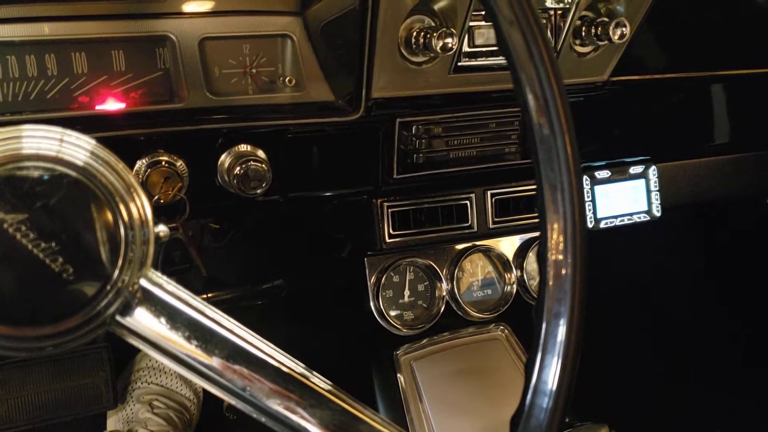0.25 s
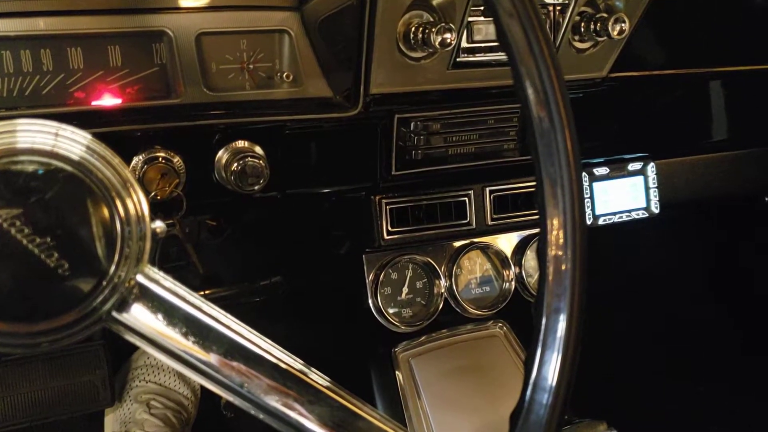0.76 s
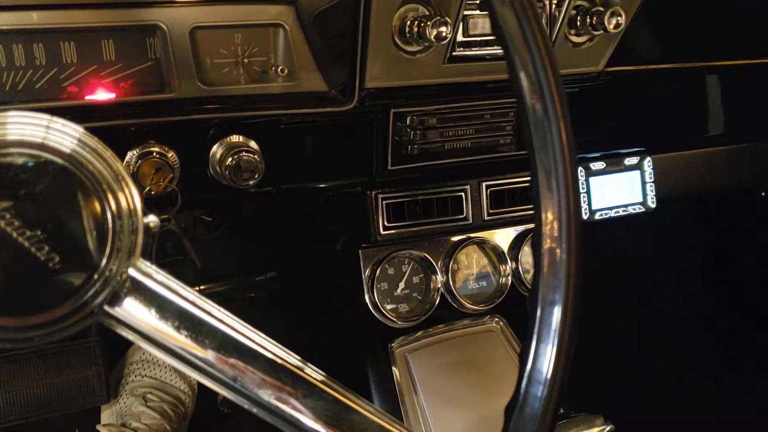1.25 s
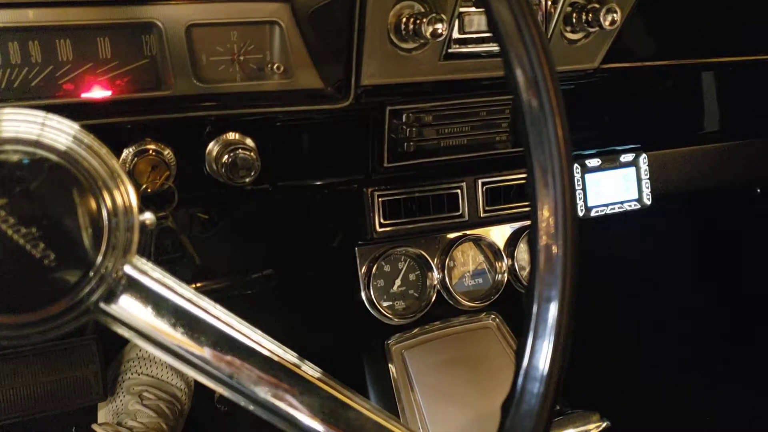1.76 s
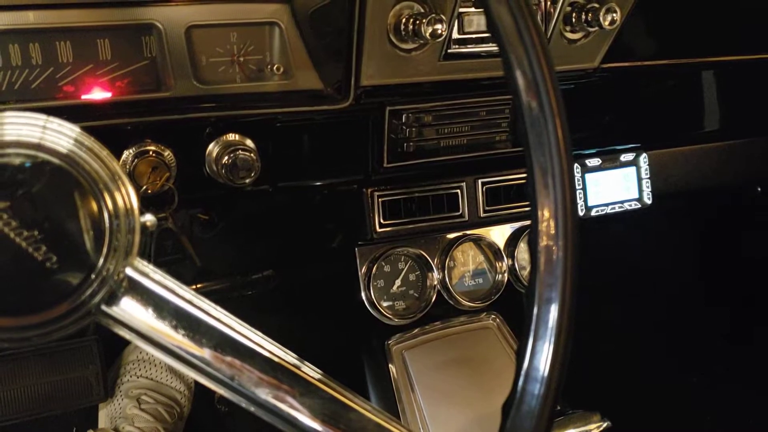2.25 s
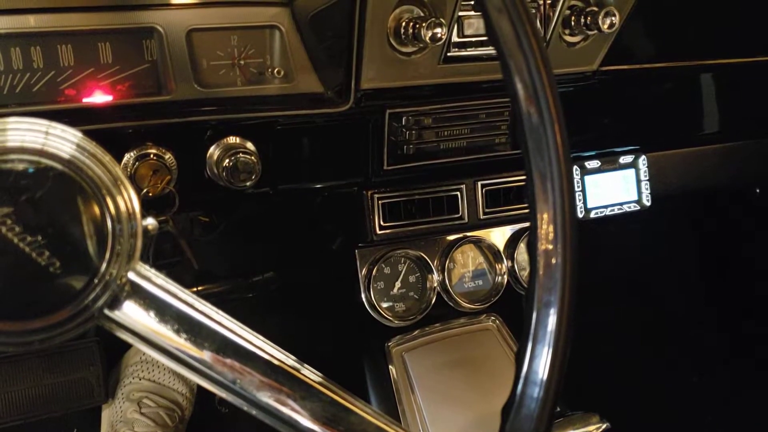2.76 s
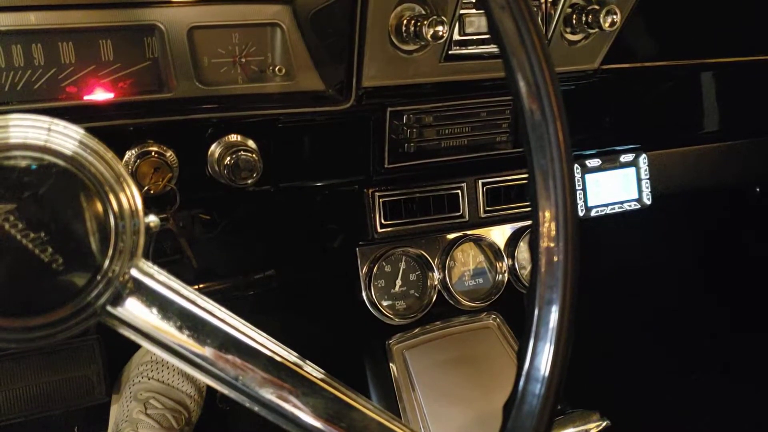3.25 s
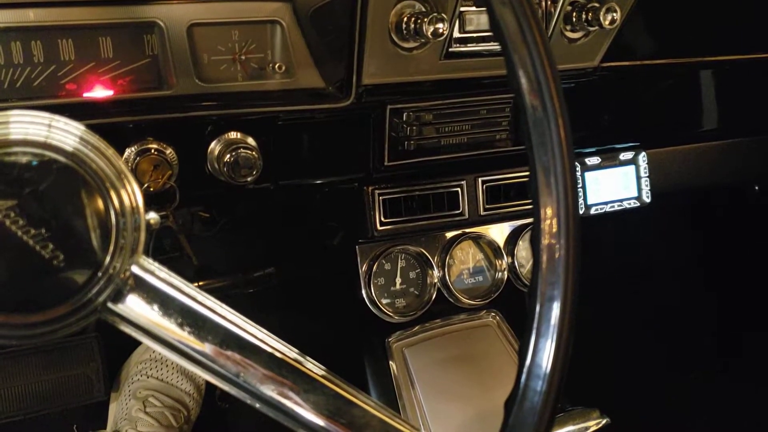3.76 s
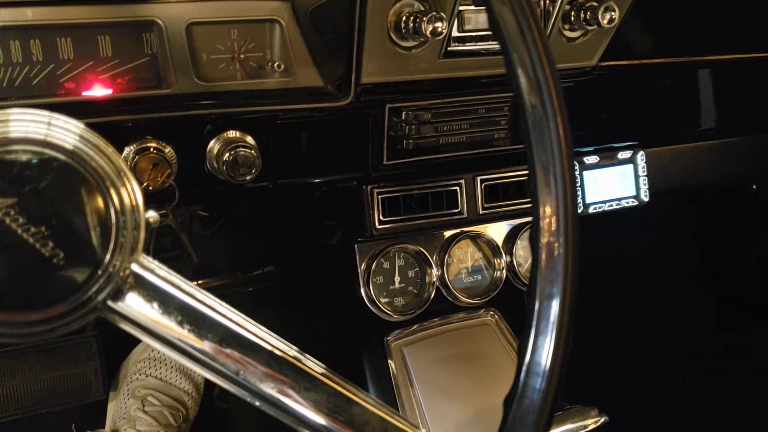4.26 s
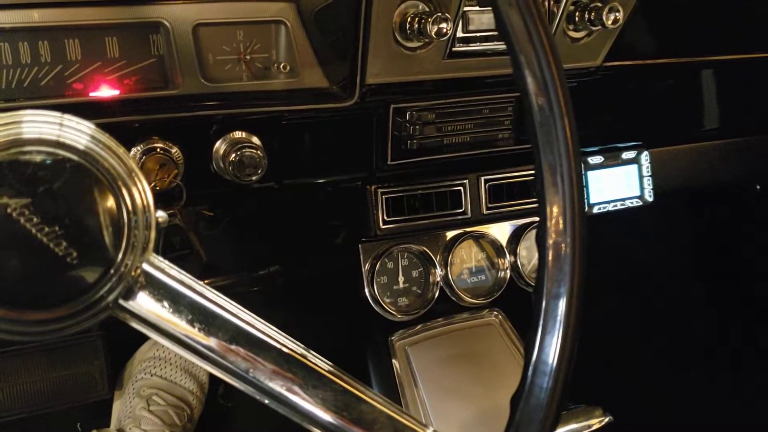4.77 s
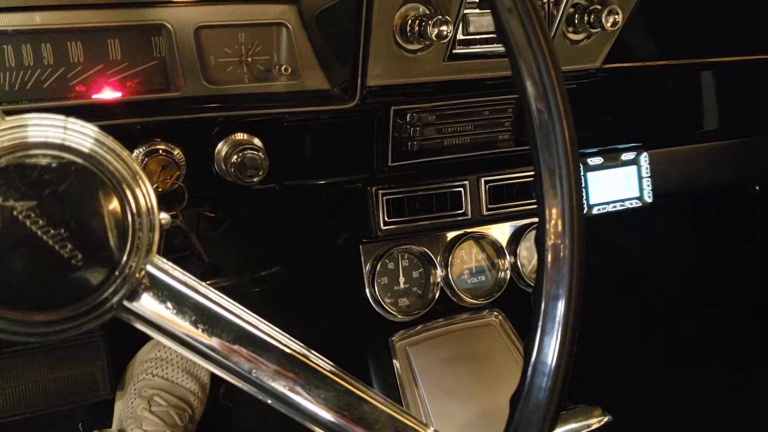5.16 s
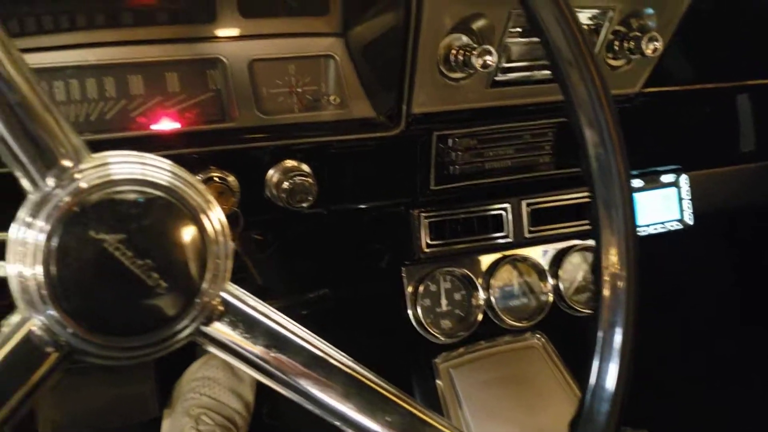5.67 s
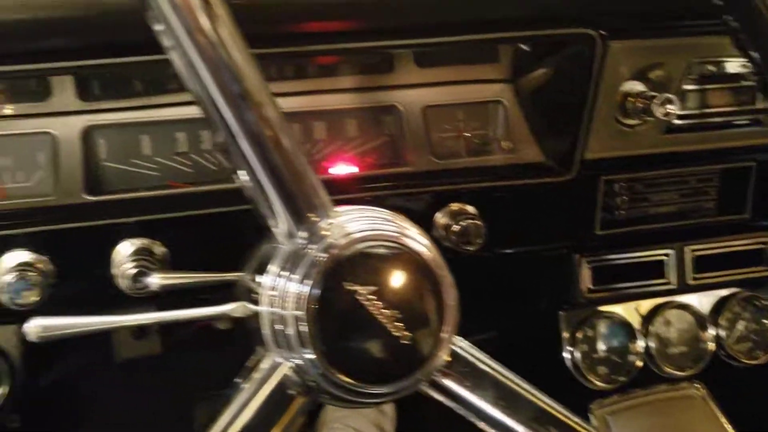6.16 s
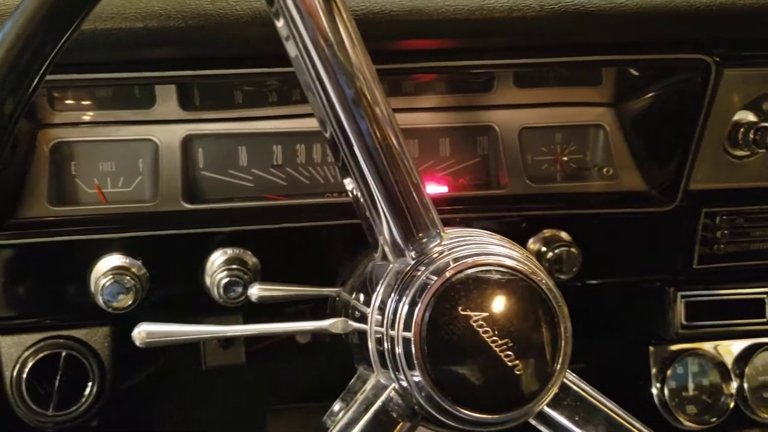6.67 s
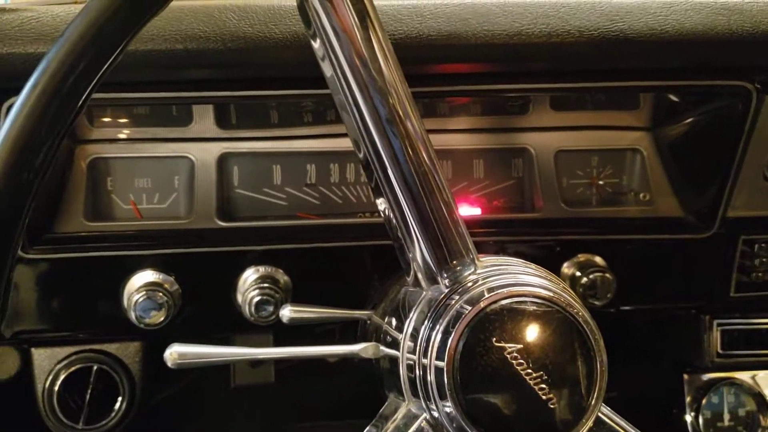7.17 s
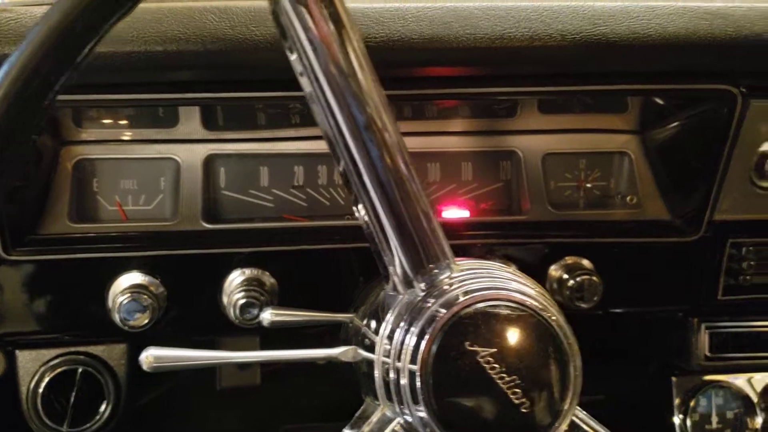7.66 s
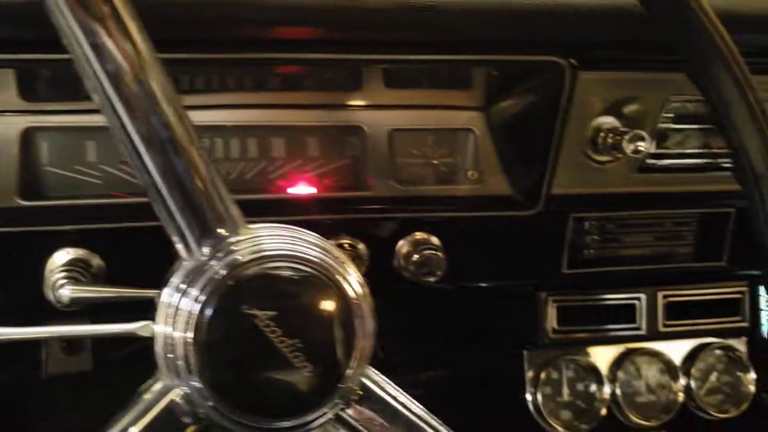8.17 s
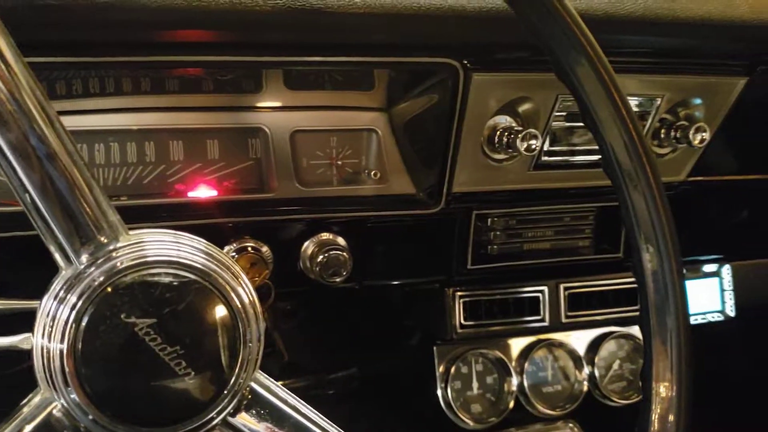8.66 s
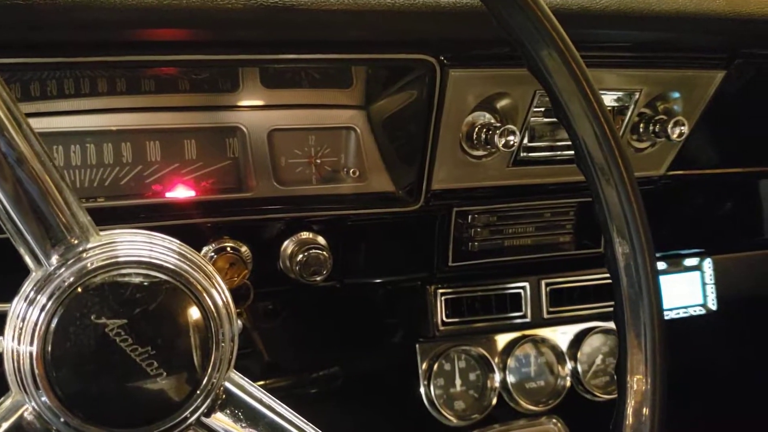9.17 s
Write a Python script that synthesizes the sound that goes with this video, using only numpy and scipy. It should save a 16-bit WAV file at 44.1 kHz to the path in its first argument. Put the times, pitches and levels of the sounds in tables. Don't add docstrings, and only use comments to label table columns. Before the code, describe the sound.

Inside a car cabin, a big eight-cylinder petrol engine climbs at once into a throaty roar, drops, then is blipped again. It falls with brief low booms to a slow, lumpy idle by about four seconds. Intake and fan hiss, valve chatter and trembling panels surround the beat. The close stereo microphone hears the hiss brighter on the left.

```python
import sys
import numpy as np
from scipy import signal
from scipy.fft import rfft, irfft
from scipy.io import wavfile
from scipy.ndimage import uniform_filter1d

SR = 44100
rng = np.random.default_rng(int(sys.argv[2]) if len(sys.argv) > 2 else 0)


def undo_db(level):
    steps = np.asarray(level, float) / 20
    return 10 ** steps


def unload_audio(sound):
    columns = np.transpose(np.atleast_2d(sound))
    steps = np.round(np.clip(columns, -1, 1) * 32767)
    wavfile.write(sys.argv[1], SR, steps.astype(np.int16))


N = 415422
T = np.arange(N) / SR
HZ = np.maximum(np.fft.rfftfreq(N, 1 / SR), 1)

# t/s, f/Hz
SPEED = [(0.0, 13.7), (0.2, 14.0), (0.38, 16.3), (0.63, 22.8), (0.81, 26.3), (0.89, 25.8), (1.38, 15.9),
         (1.5, 16.4), (1.65, 19.3), (1.81, 23.3), (1.96, 25.0), (2.06, 22.8), (2.45, 16.4), (2.7, 13.2),
         (2.91, 10.9), (3.12, 9.45), (3.3, 8.42), (3.49, 7.77), (3.8, 6.73), (3.97, 6.52), (9.42, 6.52)]
# t/s, loss/Hz, half length/s
STUMBLES = [
    (4.448, -.156, .17),
    (5.1, .174, .1),
    (5.893, -.078, .184),
    (7.281, .325, .27),
    (8.153, .265, .242),
    (8.744, -.094, .073),
    (9.22, .12, .12),
]
HUNT_HZ, HUNT_RATE_HZ = .008, 6
# t/s, held/s, depth
BLIPS = [
    (0.24, 0.12, 0.32),
    (0.38, 0.476, 0.81),
    (1.47, 0.505, 0.5),
]
PEDAL_DOWN_S, PEDAL_UP_S = 0.037, 0.3
# f/Hz, lumpy beat level/dB, hiss level/dB, panel rumble level/dB
EFFORT = [(6.07, -15, -41.5, -41.5), (8.6, -15.5, -43.5, -37.5), (10.1, -11, -39.5, -34.5),
          (13.44, -2, -36, -31), (13.83, -32.5, -34, -32), (16.63, -18.5, -33.5, -28),
          (21.1, -0.5, -28.5, -24.5), (25.7, -15.5, -28.5, -23.5)]
PEDAL_HISS_DB, PEDAL_RUMBLE_DB, PEDAL_BEAT_DB = 4.5, 4, -9
# t/s, level/dB
CAMERA_GAIN = [(0, -15.5), (.5, -12.5), (1.35, -15), (1.7, -6.5), (2.5, -13), (3.3, -11), (4.1, -9.5),
               (5, -7), (5.55, -7.5), (5.72, -4), (6.15, 0), (7.3, 1.5), (8.3, -0.5), (9.42, -1)]
BEAT_FOLLOWS, RUMBLE_FOLLOWS = 0.46, 0.89
LOPE_DB = 0.56
# t/s, level/dB
SURGES = [(4.2, -1.5), (4.6, -2), (5.0, -1), (5.45, -0.5), (5.85, -1), (6.2, 0), (6.6, -1), (7.0, 0.5),
          (7.35, -1), (7.7, 2), (8.05, -0.5), (8.4, 0.5), (8.7, 1.5), (9.1, 0)]
SURGE_HALF_S = 0.32
# t/s, hiss level/dB
LULLS = [
    (4.15, -3.5),
    (5.08, 1.5),
    (5.545, -3.5),
    (5.85, -1),
    (7.38, -1.5),
    (8.17, -5),
    (8.47, -4.5),
    (9.1, 0.5),
]
LULL_HALF_S = 0.02

# level/dB, lateness/firing intervals
CYLINDERS = [(.7, .63), (5, .15), (.2, .7), (.1, .13), (-4, .02), (-7.2, -.62), (-9.9, .46), (2.2, .06)]
BANKS = [1, -1, -1, 1, -1, 1, 1, -1]
# f/Hz, width/Hz, level/dB, sign
CABIN = [(56, 16.7, -1.5, 1), (65.2, 6.5, 3.2, -1), (84, 12, -14.2, -1), (124, 10, -24.5, -1),
         (40, 10, -13.9, 1)]
# f/Hz, width/Hz, level/dB, signed weight
PIPES = [(43.2, 35, -19, 0.78), (65.7, 13, 2.5, -0.59), (91, 15, -3, 0.54), (125, 33, -4, -0.67),
         (157, 16, -10, 0.61), (205, 16, -8.5, -1.7), (324, 61, -3, 0.41), (418, 240, -14.5, -0.35)]
# firing f/Hz, level/dB
DRONE_PULL = [(110, -16.5), (122, -8.5), (134, -5.5), (157, -6.5), (172, -17.5), (186, -23), (196, -36),
              (210, -16)]
# firing f/Hz, level/dB
DRONE_COAST = [(52, -59), (61, -6), (68, -3), (76, 1.5), (87, -2.5), (105, -25.5), (127, -6.5), (146, -38)]
OVERRUN_HZ, OVERRUN_WIDTH_HZ, OVERRUN_DB = 185, 12, -38
OVERTONE_HZ, OVERTONE_WIDTH_HZ, OVERTONE_DB = 125, 12, -15

ORDERS = [2, 3, 4, 5, 6, 7, 9, 10, 11, 13, 16, 19, 21, 24, 27, 32]
# pulling level/dB, coasting level/dB
ORDERS_HEARD = [(-6, -12), (-13.5, -5.5), (-10.5, -6.5), (-8, -8.5), (-18.5, -12.5), (-35, -17.5),
                (-24, -9), (-41, -16.5), (-13, -14), (-10, -21), (-14.5, -18), (-15.5, -23), (-16.5, -24.5),
                (-16.5, -23), (-23.5, -32), (-25, -27)]
# f/Hz, level/dB
BODY_PULL = [(35, -34), (50, -20), (62, -9), (72, -3.5), (82, 2.5), (97, -15.5), (117, -2.5), (135, -4.5),
             (275, -11.5), (310, -20), (480, -15), (620, -26), (850, -19), (1000, -36)]
# f/Hz, level/dB
BODY_COAST = [(35, -26), (48, -8), (56, -6), (63, 3), (76, -1), (85, -4), (97, -18.5), (115, -4), (140, -3),
              (170, -30), (300, -14), (500, -32), (1000, -45)]
FLOOR_HZ, FLOOR_WIDTH_HZ, FLOOR_DB = 205, 11.4, -6.5
GROWL_DB, GROWL_WAVER_DB = -0.5, 1.1
UPPER_IDLE_DB = -15

# f/Hz, spectral level/dB
HISS_IDLE = [(900, -23.5), (1200, -12.5), (1600, -3), (1950, -2), (2300, -8.5), (2900, -11), (3400, -7),
             (4200, -5), (4900, -11), (6200, -9), (7000, -9), (8300, -18.5), (11500, -24.5), (15600, -46.5)]
# f/Hz, spectral level/dB
HISS_REV = [(600, -33), (830, 3.5), (1000, -16), (1300, -8), (1700, -4.5), (2050, 3.5), (2500, -8),
            (2900, -8), (4100, -5.5), (5200, -11), (7000, -7), (8300, -19.5), (11500, -23), (15000, -61)]
# f/Hz, width/Hz, level/dB, signed weight
INTAKE_IDLE = [(1744, 40, 3.5, 0.86), (1830, 30, -3, 1), (1908, 21, 5, -1.2), (2067, 18, 8.5, 0.64),
               (2163, 13, 4, -0.97), (1310, 60, -2, 0.95), (2364, 32, -3, 0.92), (2567, 38, -2, -0.82),
               (2770, 25, -5.5, 0.87)]
# f/Hz, width/Hz, level/dB, signed weight
INTAKE_REV = [(1995, 51, 2, 1), (2196, 46, 0, -1.13), (2346, 85, -3, 0.77), (2530, 93, -1.5, -0.75),
              (820, 61, -2.5, 0.97), (2985, 120, -13.5, 0.86), (3950, 230, -7, 0.81),
              (5200, 390, -14, -1.08)]
# f/Hz, width/Hz, level/dB, sign
TAPPETS = [(3370, 250, -10, 1), (3685, 290, -4.5, 1), (4243, 380, -4, 1), (4520, 120, -13, 1)]
RASP_DB, RASP_LOAD_DB, RASP_OPEN_DB = -14.5, 8, 10
RASP_SHUT_S = 0.044
RASP_GLIDE = .07

# f/Hz, spectral level/dB
RUMBLE = [(30, -31), (70, 11), (150, 5), (208, -2), (260, -7.5), (360, -13), (600, -17), (850, -15),
          (1200, -24), (1500, -45.5)]
# f/Hz, width/Hz, level/dB, signed weight
SEAT = [(39.7, 5, -3.5, 0.83), (33, 6, -2, -1), (132.6, 33, -4.5, 1)]
# f/Hz, width/Hz, level/dB, signed weight
DASH = [(420, 20, -52, 0.89), (678.4, 47, -47.5, 0.74), (970, 13, -54.5, 0.64), (1856, 30, -60, 0.52),
        (4200, 43, -97, 0.56)]
# f/Hz, level/dB against the rumble
WHINES = [(421, -12), (673, -14.5), (712, -18), (832, -21), (952, -15), (1018, -21.5)]
BASS_CLEARS = .55
BUZZ_HZ, BUZZ_DB, BUZZ_FLUTTER_DB = 676, -2, 3
# t/s, f/Hz, rms level/dB, half length/s
SHUDDERS = [
    (.04, 148.4, -31.5, 0.11),
    (1.42, 63.1, -19.5, 0.25),
    (2.002, 40.4, -22, 0.051),
    (2.234, 62.5, -13, 0.033),
    (2.438, 61.8, -15, 0.06),
]
# t/s, peak level/dB
CREAKS = [(3.408, -56), (3.438, -60), (3.455, -55), (3.471, -51), (3.487, -54), (3.503, -57), (3.519, -56),
          (3.537, -48), (3.552, -57), (3.568, -54), (3.585, -53), (3.618, -54), (3.634, -59)]
# f/Hz, width/Hz, level/dB, sign
CREAK_RING = [(11800, 1200, -2, 1), (14600, 5000, -5, -1)]

# f/Hz, right minus left level/dB
RIGHT = [(50, -2.5), (75, -2.8), (120, -4.5), (300, -5.5), (600, -5), (900, -9), (2000, -9), (2900, -12),
         (4200, -15), (7000, -18), (8300, -18), (9500, -4), (11800, 5.5), (15000, 0.14)]
# f/Hz, likeness from 0 to 1
LIKE = [(100, .93), (250, .78), (600, .77), (900, .55), (2000, .55), (3000, .12), (8000, .05)]
RIGHT_LAG_S = 20 / 44100


def curve(table):
    s, *columns = np.transpose(table)
    return [np.interp(T, s, column) for column in columns]


def against(x, table):
    at, *columns = np.transpose(table)
    return [np.interp(np.log(x), np.log(at), column) for column in columns]


def spectrum(points):
    return against(HZ, points)[0]


def bump(x, centre, half):
    return np.exp(-((x - centre) / half) ** 2)


def modes(table):
    response = 0
    for hz, width, db, sign in table:
        damping = 1j * HZ * width
        response = response + sign * undo_db(db) * damping / (hz ** 2 - HZ ** 2 + damping)
    return response


def high_pass(hz):
    s = 1j * HZ / hz
    return (s * s / (s * s + np.sqrt(2) * s + 1)) ** 2


def soft(hz):
    return 1 / (1 + (HZ / hz) ** 4)


def filtered(x, response):
    return irfft(rfft(x) * response, N)


def steady(x, span_s):
    size = int(span_s * SR)
    power = uniform_filter1d(uniform_filter1d(x ** 2, size), size)
    return x / np.sqrt(power + 1e-12)


def walk(rate_hz):
    k = int(SR / rate_hz)
    held = np.repeat(rng.standard_normal(N // k + 1), k)
    return 1.3 * uniform_filter1d(uniform_filter1d(held, k), k)[:N]


def noise_pair(response):
    pair = filtered(rng.standard_normal((2, N)), response)
    return pair / pair.std()


def glide(x, ratio):
    where = np.cumsum(ratio) % (N - 1)
    return np.array([np.interp(where, np.arange(N), channel) for channel in x])


def speed():
    hz = uniform_filter1d(curve(SPEED)[0], SR // 16) + HUNT_HZ * walk(HUNT_RATE_HZ)
    return hz - sum(lost * bump(T, s, half) for s, lost, half in STUMBLES)


def pedal(up_s):
    opening = 0
    for s, held, depth in BLIPS:
        pressing = (T - s) / PEDAL_DOWN_S
        releasing = 1 - (T - s - held) / up_s
        opening = opening + depth * np.clip(np.minimum(pressing, releasing), 0, 1)
    return opening


def creaks():
    ticks = np.zeros(N)
    for s, db in CREAKS:
        ticks[int(s * SR)] = undo_db(db + 11)
    burst = rng.standard_normal(400) * np.exp(-np.arange(400) / (0.0012 * SR))
    return filtered(np.convolve(ticks, burst)[:N], high_pass(9500) * modes(CREAK_RING) * 1.7)


def motor_whine():
    out = 0
    for hz, db in WHINES:
        level = undo_db(db + 1.8 * walk(25))
        wavering_hz = hz * (1 + 0.0085 * hz / 700 * walk(22))
        out = out + level * np.sin(2 * np.pi * np.cumsum(wavering_hz) / SR)
    return out


def panels(rumble_db, roar, load):
    shake = noise_pair(undo_db(spectrum(RUMBLE))) * undo_db(.6 * walk(12))
    shake -= BASS_CLEARS * np.sqrt(roar) * filtered(shake, soft(190))
    shake += noise_pair(modes(SEAT) ** 2) * undo_db(-5.0 - 10 * roar)
    ring = noise_pair(modes(DASH) * high_pass(340))
    whine = [[2], [0]] * motor_whine()
    mix = undo_db(11.0) * shake
    mix = mix + undo_db(-4.5 - 14.0 * roar * load) * ring
    mix = mix + undo_db(-15 * np.sqrt(roar)) * whine
    return undo_db(rumble_db) * mix


def buzz(level_db):
    wavering_hz = BUZZ_HZ * (1 + 0.0132 * walk(30.14))
    return undo_db(level_db + BUZZ_FLUTTER_DB * walk(28)) * np.sin(2 * np.pi * np.cumsum(wavering_hz) / SR)


def shudders():
    out = 0
    for s, hz, db, half in SHUDDERS:
        out = out + undo_db(db) * np.sqrt(2) * bump(T, s, half) * np.sin(2 * np.pi * hz * T)
    return out


def air(cycle, hiss_db, roar, load):
    throb_db = 2.6 * np.cos(2 * np.pi * (cycle - .53)) + 1.7 * np.cos(2 * np.pi * (3 * cycle - .35))
    idle = noise_pair(undo_db(spectrum(HISS_IDLE))) * undo_db(0.45 * throb_db + 1.1 * walk(14))
    idle += noise_pair(modes(INTAKE_IDLE) * high_pass(900)) * undo_db(-5.5 + 2.14 * walk(23))
    for mode in TAPPETS:
        chirp_db = throb_db + 3.5 * walk(55)
        idle += noise_pair(modes([mode]) ** 2) * undo_db(mode[2] - 9.5 + chirp_db)
    revving = noise_pair(undo_db(spectrum(HISS_REV))) * undo_db(0.51 * walk(24.4))
    rasp = glide(noise_pair(modes(INTAKE_REV) * high_pass(470)), 1 + RASP_GLIDE * (roar - .85))
    opening = np.clip(2 * pedal(RASP_SHUT_S), 0, 1)
    rasp *= undo_db(RASP_DB + RASP_LOAD_DB * load + RASP_OPEN_DB * opening + walk(21))
    mix = np.sqrt(1 - roar) * idle + np.sqrt(roar) * revving + roar ** 0.016 * rasp
    return undo_db(hiss_db + 3.5) * mix


def growl(hz, cycle, level_db, load, roar):
    out = 0
    for k, (pull_db, coast_db) in zip(ORDERS, ORDERS_HEARD):
        (body_pull_db,), (body_coast_db,) = against(k * hz, BODY_PULL), against(k * hz, BODY_COAST)
        fade_db = (k > 8) * UPPER_IDLE_DB * np.clip(1 - 2 * roar, 0, 1)
        pull = undo_db(pull_db + body_pull_db + fade_db)
        floor = roar * undo_db(FLOOR_DB) * bump(k * hz, FLOOR_HZ, FLOOR_WIDTH_HZ)
        coast = undo_db(coast_db) * (undo_db(body_coast_db) + floor)
        size = load * pull + (1 - load) * coast
        waver = undo_db(GROWL_WAVER_DB * (1.5 - load) * walk(12))
        out = out + size * waver * np.sin(2 * np.pi * k * cycle + k ** 2)
    return np.sqrt(2) * undo_db(level_db) * out


def drone(firing_hz, load):
    (pull_db,), (coast_db,) = against(firing_hz, DRONE_PULL), against(firing_hz, DRONE_COAST)
    coast = undo_db(coast_db) + undo_db(OVERRUN_DB) * bump(firing_hz, OVERRUN_HZ, OVERRUN_WIDTH_HZ)
    pulling = np.clip(3 * load - .4, 0, 1) * (firing_hz > 108)
    return 20 * np.log10(pulling * undo_db(pull_db) + (1 - pulling) * coast)


def firings(cycle, strength, late, scatter_db, jitter):
    count = np.arange(int(8 * cycle[-1]) + 1)
    chance = rng.standard_normal((len(count), 2)).T
    size = strength[count % 8] * undo_db(scatter_db * chance[0])
    turn = (count + late[count % 8] + jitter * chance[1]) / 8
    where = np.interp(turn, cycle, np.arange(N))
    return np.bincount(where.astype(int), size, N)


def engine(cycle, even_db, lumpy_db, fast, load):
    strength_db, late = np.transpose(CYLINDERS)
    idle = firings(cycle, undo_db(strength_db), late, scatter_db=.85, jitter=.015)
    idle = filtered(idle, modes(CABIN) * high_pass(45) * np.sqrt(1 - soft(54)) * soft(170))
    pulling = firings(cycle, np.array(BANKS) + .1, .4 * late, scatter_db=.6, jitter=.015)
    pulling = filtered(pulling, modes(PIPES) * high_pass(63.0) * soft(276))
    coasting = firings(cycle, np.array(BANKS) + .3, .6 * late, scatter_db=2.5, jitter=.05)
    coasting = filtered(coasting, modes(PIPES) * high_pass(49) * soft(120))
    revving = np.sqrt(load) * steady(pulling, .15) + np.sqrt(1 - load) * steady(coasting, .2)
    beat = np.sqrt(1 - fast) * steady(idle, .4) + np.sqrt(fast) * undo_db(-19) * revving
    phase = 2 * np.pi * 8 * cycle
    overtone_hz = 2 * np.gradient(phase) * SR / (2 * np.pi)
    overtone = undo_db(OVERTONE_DB) * bump(overtone_hz, OVERTONE_HZ, OVERTONE_WIDTH_HZ)
    even = np.cos(phase) + (1 - fast) * overtone * np.cos(2 * phase)
    return undo_db(lumpy_db) * beat + undo_db(even_db) * np.sqrt(2) * even


def ports(boom, shared, own):
    like = np.clip(spectrum(LIKE), 0, 1)
    late = (rfft(boom) + like * rfft(shared)) * np.exp(-2j * np.pi * HZ * RIGHT_LAG_S)
    right = undo_db(spectrum(RIGHT)) * (late + np.sqrt(1 - like ** 2) * rfft(own))
    return np.array([boom + shared, irfft(right, N)])


def scene():
    hz = speed()
    cycle = np.cumsum(hz) / SR
    fast = np.clip((hz - 7.3) / 4, 0, 1)
    roar = np.clip((hz - 13) / 8, 0, 1)
    load = np.clip(.75 + uniform_filter1d(np.gradient(hz), SR // 10) * SR / 20, 0, 1)
    press = pedal(PEDAL_UP_S)
    (gain_db,) = curve(CAMERA_GAIN)
    lumpy_db, hiss_db, rumble_db = against(hz, EFFORT)
    lumpy_db = lumpy_db + PEDAL_BEAT_DB * press + BEAT_FOLLOWS * gain_db + LOPE_DB * walk(14.0)
    lumpy_db = lumpy_db + sum(db * bump(T, s, SURGE_HALF_S) for s, db in SURGES)
    hiss_db = hiss_db + PEDAL_HISS_DB * press + gain_db
    hiss_db = hiss_db + sum(db * bump(T, s, LULL_HALF_S) for s, db in LULLS)
    rumble_db = rumble_db + PEDAL_RUMBLE_DB * press + RUMBLE_FOLLOWS * gain_db
    even_db = drone(8 * hz, load) + gain_db

    air_load = np.maximum(load, np.clip(1.2 * press, 0, 1))
    shared, own = panels(rumble_db, roar, load) + air(cycle, hiss_db, roar, air_load)
    boom = shudders() + fast * buzz(rumble_db + BUZZ_DB - 9 * roar)
    boom = boom + fast * growl(hz, cycle, gain_db + GROWL_DB, load, roar)
    boom = boom + undo_db(1.4) * engine(cycle, even_db, lumpy_db, fast, load)
    return ports(boom, shared, own) + creaks()


def roll_off(x):
    return signal.sosfilt(signal.butter(12, 15620, fs=SR, output="sos"), x)


def record(dry):
    return roll_off(dry)


dry = scene()
out = record(dry)
unload_audio(out)
```